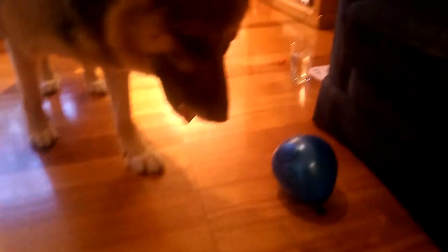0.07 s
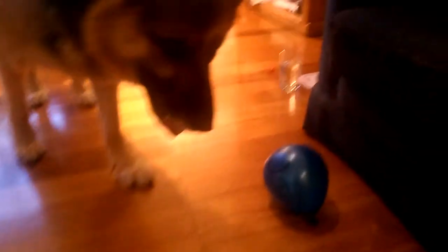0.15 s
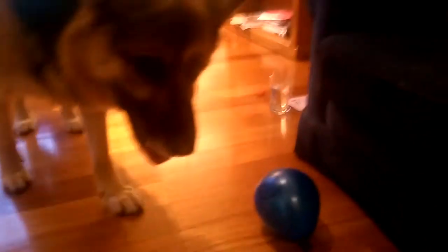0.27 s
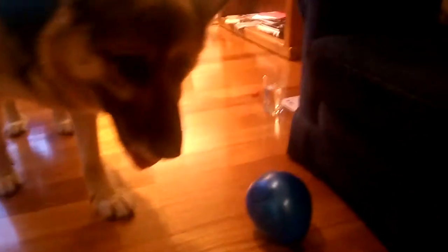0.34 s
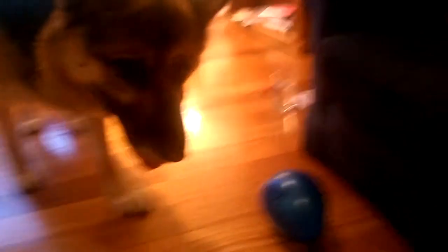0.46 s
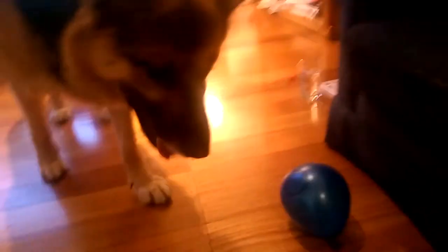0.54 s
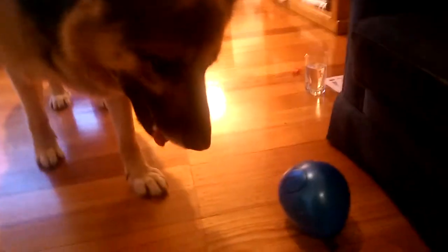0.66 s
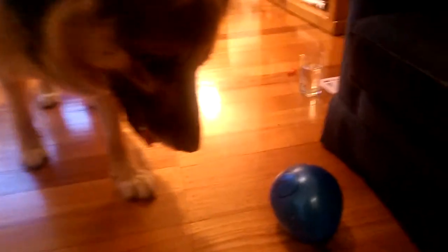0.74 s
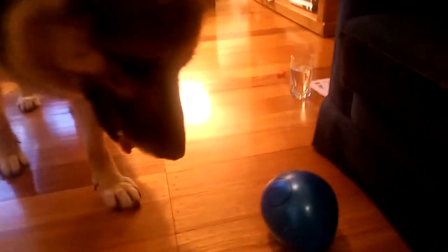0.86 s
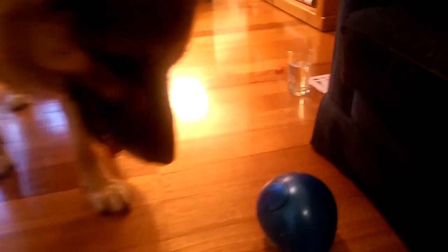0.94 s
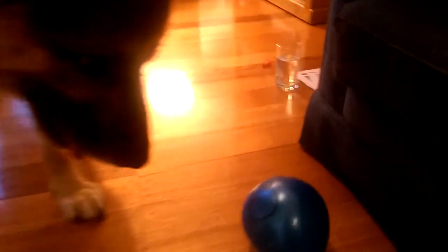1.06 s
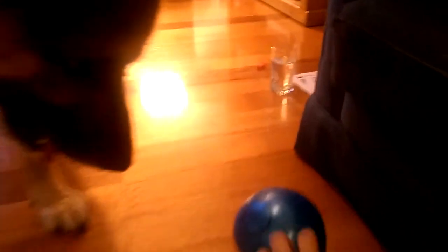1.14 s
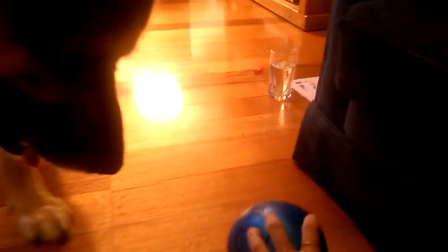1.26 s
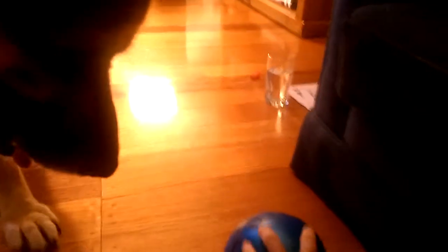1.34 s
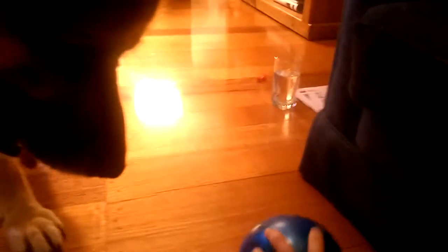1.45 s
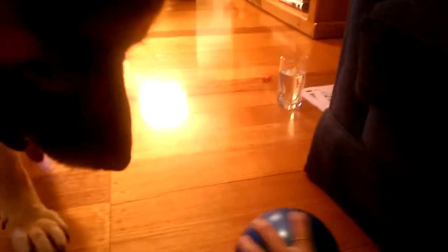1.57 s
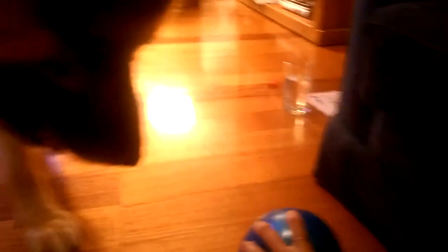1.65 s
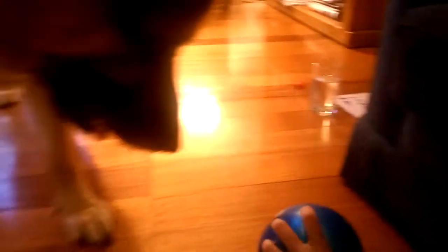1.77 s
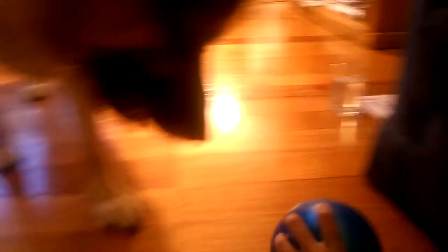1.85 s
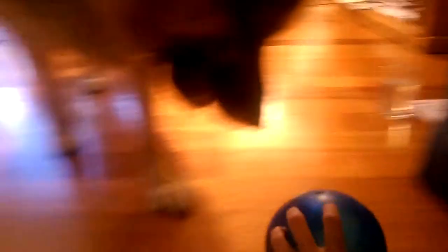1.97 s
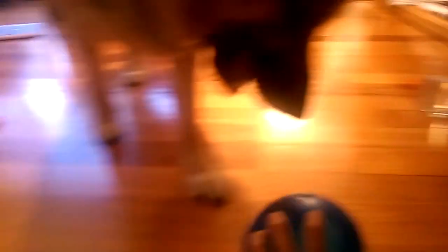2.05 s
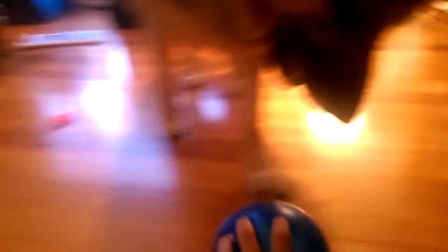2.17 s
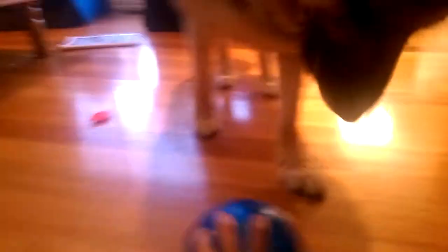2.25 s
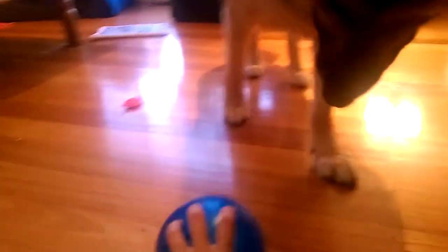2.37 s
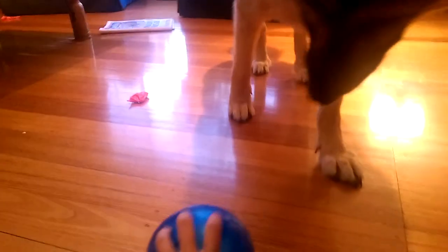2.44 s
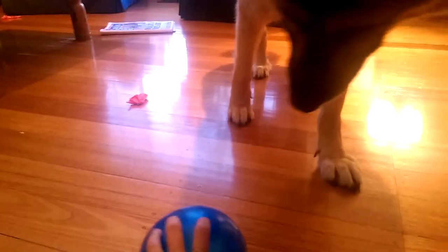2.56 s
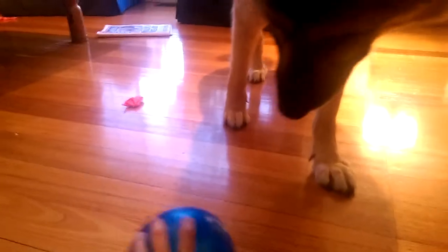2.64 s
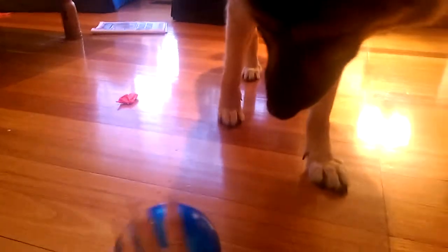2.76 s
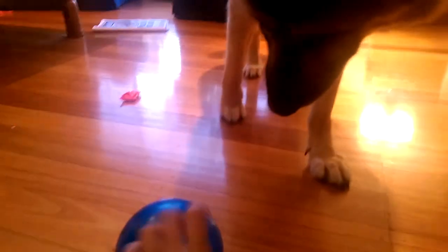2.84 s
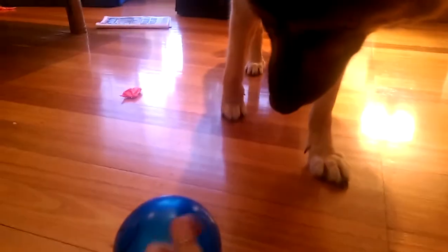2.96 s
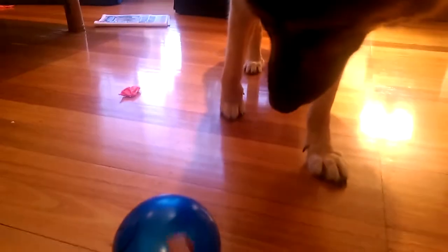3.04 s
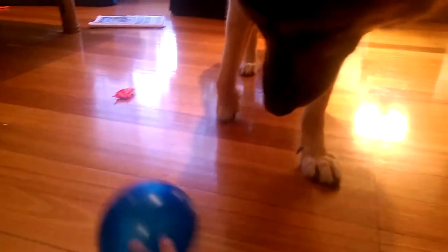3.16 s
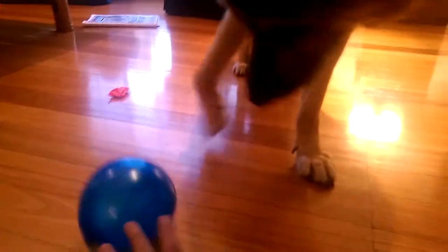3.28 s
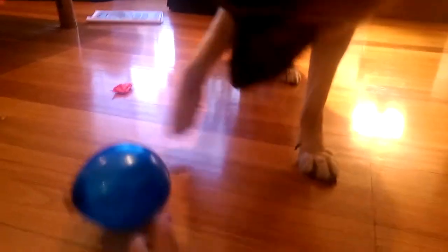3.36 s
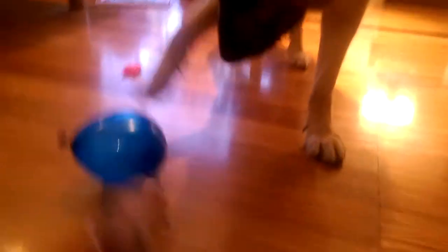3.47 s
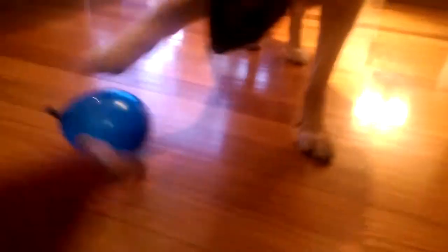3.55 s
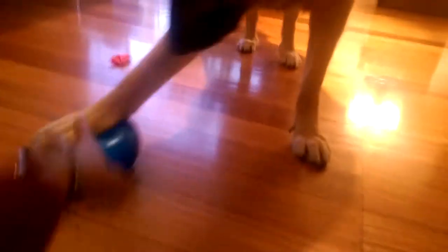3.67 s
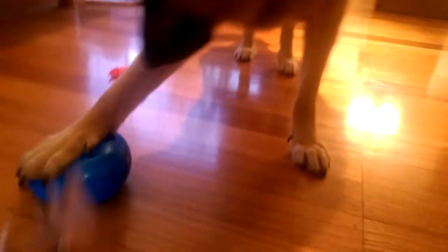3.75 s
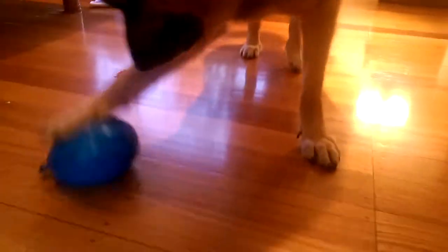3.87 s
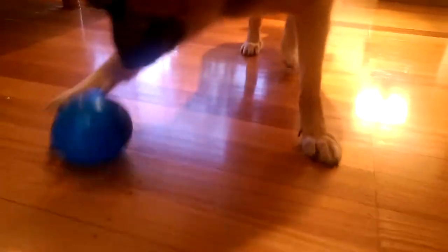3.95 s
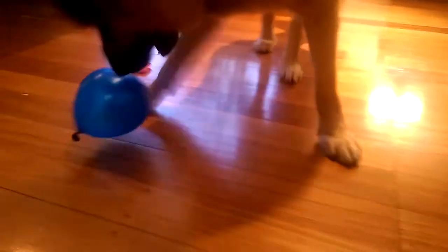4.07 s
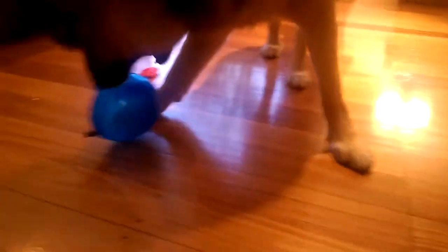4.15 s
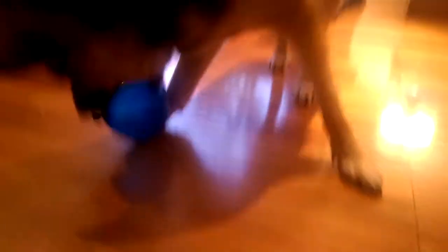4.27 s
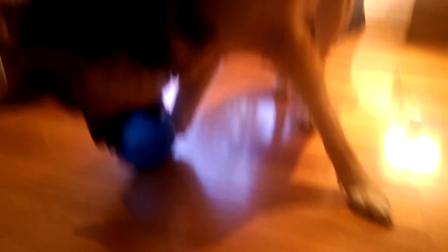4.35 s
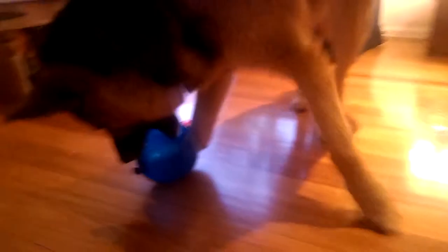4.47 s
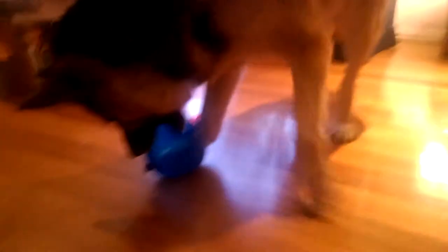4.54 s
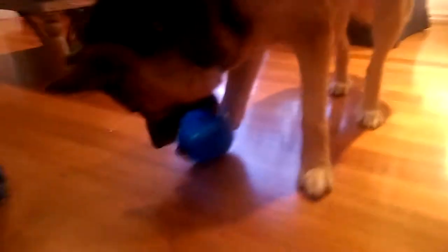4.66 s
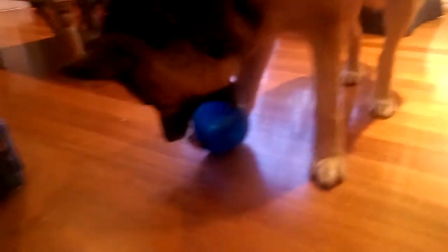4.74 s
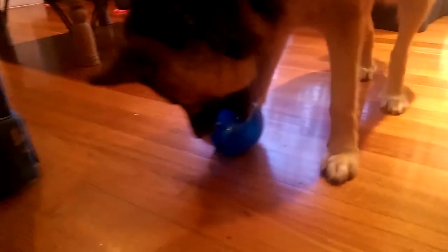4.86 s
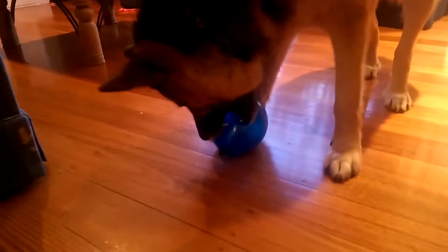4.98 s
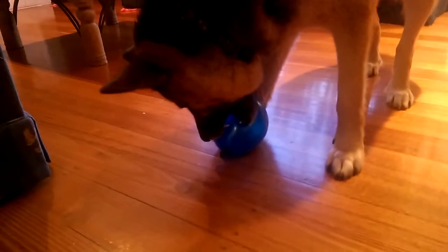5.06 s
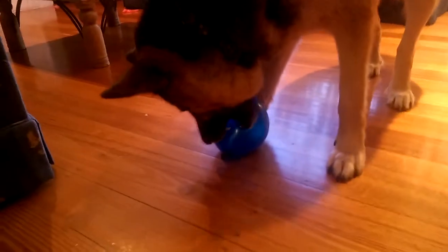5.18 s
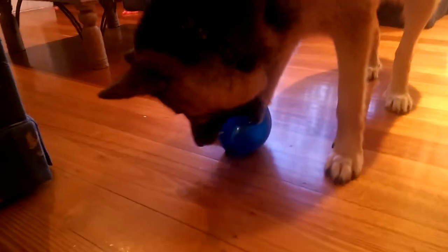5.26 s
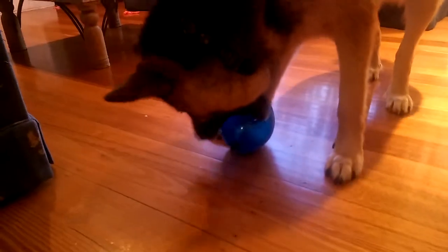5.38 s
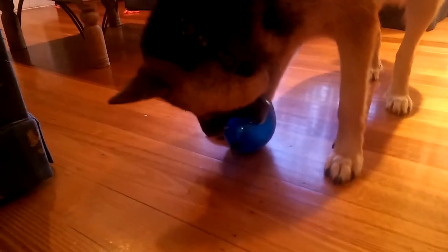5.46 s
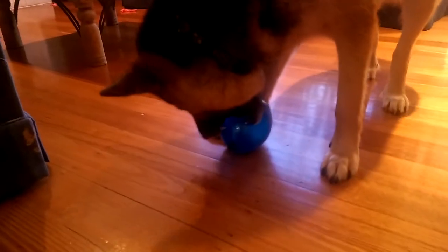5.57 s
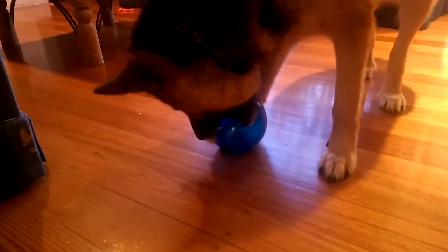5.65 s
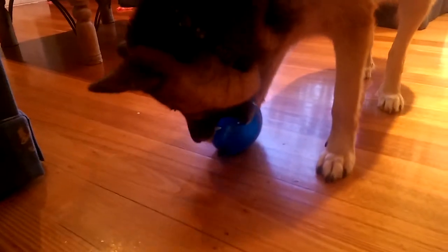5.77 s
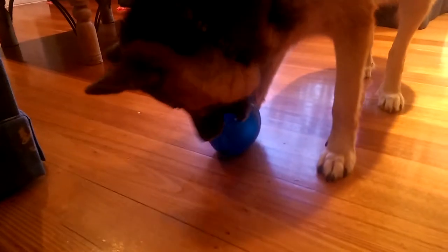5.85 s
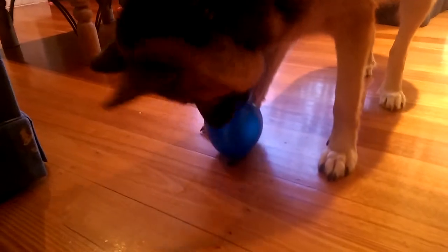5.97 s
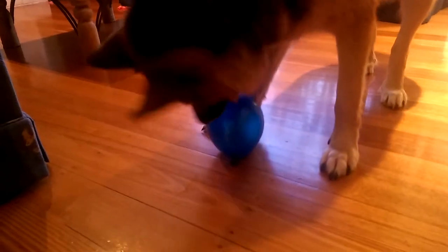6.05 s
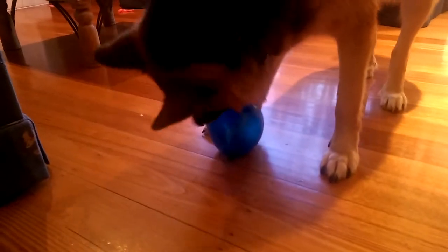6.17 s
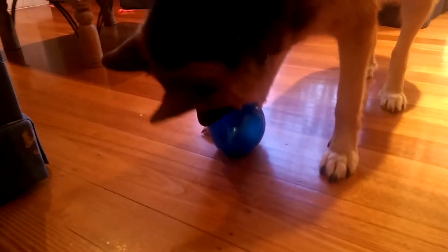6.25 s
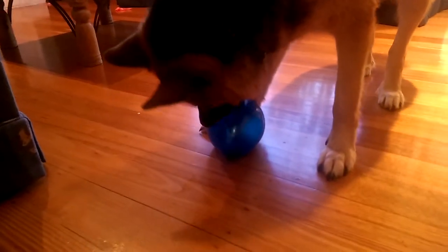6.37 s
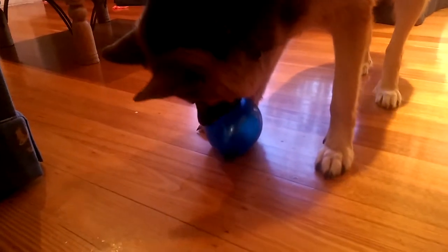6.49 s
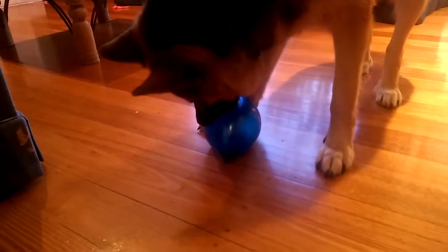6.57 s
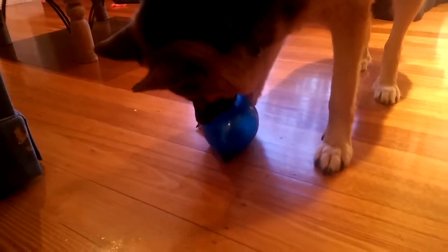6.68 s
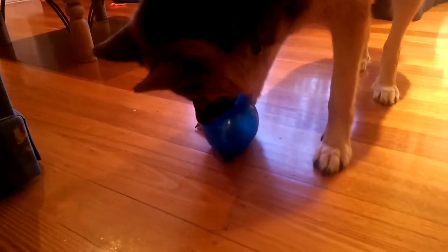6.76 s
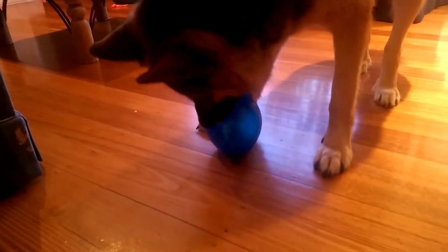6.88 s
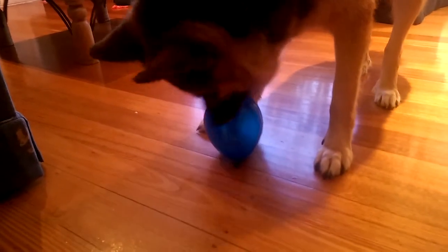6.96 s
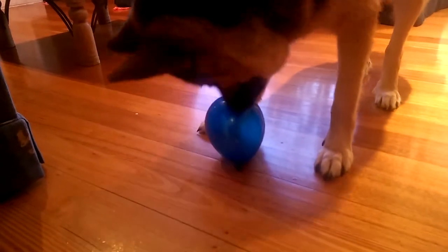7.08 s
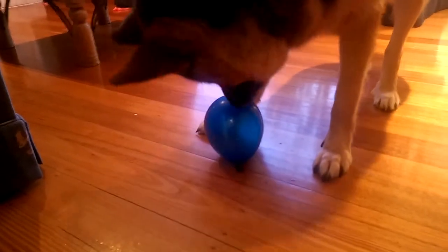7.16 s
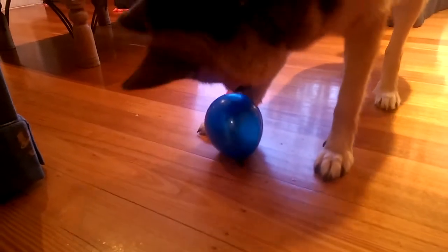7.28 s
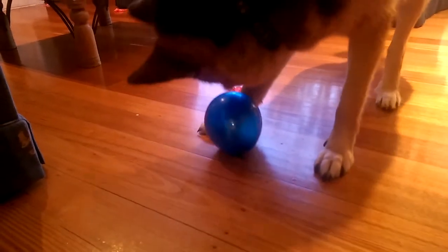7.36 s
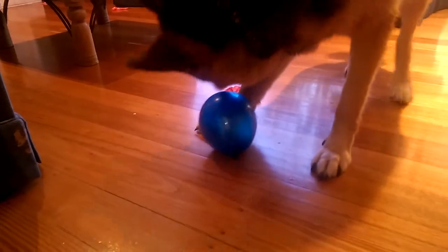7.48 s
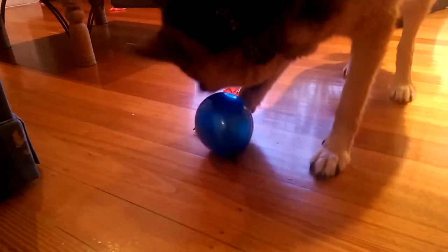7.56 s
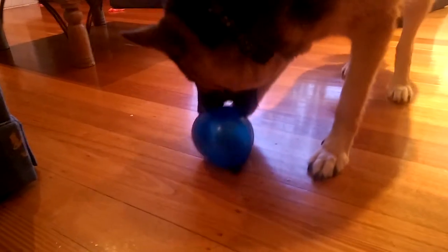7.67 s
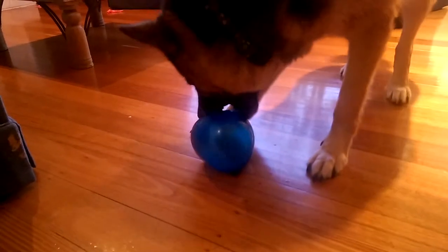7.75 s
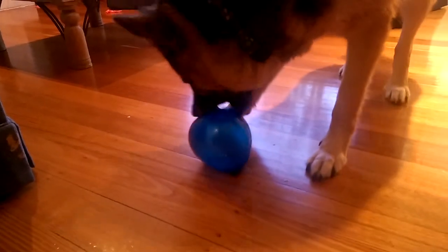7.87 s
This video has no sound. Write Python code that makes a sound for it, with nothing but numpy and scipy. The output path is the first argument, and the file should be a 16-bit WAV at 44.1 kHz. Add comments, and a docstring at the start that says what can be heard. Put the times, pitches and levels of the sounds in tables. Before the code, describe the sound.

A close handheld stereo microphone hears a dog with a small balloon on floorboards. Muffled booms and light finger taps lead to hard claw clicks and a hollow rubbery slap. Teeth then scrape and slip over the latex in dry, stuttering clusters with gaps between, the air inside ringing briefly. It ends with quiet knocks and faint rubbing, in a small live room with low background noise.

```python
"""A dog plays with a small latex balloon on a wooden living-room floor, over a steady, low room noise.
First fur and paws brush (shaped noise), the nose whistles faintly (a wavering tone) and soft blows boom.
Then claws click on the boards (short noise bursts), taps and a finger squeak touch the rubber, and a paw slaps it.
Then teeth gnaw: each stick-slip release scratches and rings the skin and the air inside (decaying modes),
and wet lips slide (smooth noise through the air modes).
Near the end come a few small knocks and a nudge, then a last light drag over the rubber."""
import sys
import numpy as np
from scipy import signal
from scipy.fft import rfft, irfft
from scipy.io import wavfile
from scipy.ndimage import map_coordinates

SR = 44100
rng = np.random.default_rng(int(sys.argv[2]) if len(sys.argv) > 2 else 0)


def pcm_store(signal):
    """Save signal as 16-bit PCM."""
    levels = np.round(np.clip(np.atleast_2d(signal), -1, 1) * 32767)
    wavfile.write(sys.argv[1], SR, levels.astype(np.int16).T)


N = 349272  # length of the scene in samples

# Event levels are starting points: functions may trim each part of a sound up or down.
# a tooth slips once: (time [s], level [dB], depth of the bite [0-1])
SLIPS = [(4.413, -34.5, 0.08), (4.43, -30, 0.17), (4.45, -33.5, 0.44), (4.466, -31, 0.25),
         (4.51, -33, 0.52), (4.517, -29, 0.5), (4.551, -29.5, 0.2), (4.911, -32, .3), (4.917, -25, 0.48),
         (4.933, -34.5, 0.23), (4.938, -35, 0.2), (4.982, -28, 0.1), (4.993, -30, 0.9), (5.027, -27, 0.74),
         (5.062, -25, .55), (5.081, -27.5, 0.65), (5.172, -20.5, 0.52), (5.252, -30, 0.32),
         (5.474, -35.5, 0.34), (5.518, -37.5, 0.1), (5.53, -36, 0.1), (5.555, -36.5, 0.14),
         (5.572, -35.5, 0.2), (5.584, -34.5, 0.07), (5.593, -35.5, .15), (5.602, -29, 0.44),
         (5.623, -27, .65), (5.643, -28.5, 0.6), (5.652, -30.5, 0.34), (5.676, -29, 0.55),
         (5.6905, -17.5, 0.59), (5.717, -34, .65), (5.745, -28.5, 0.78), (5.781, -30.5, 0.34),
         (6.275, -33.5, 0.54), (6.405, -32.5, 0.35), (6.551, -32.5, 0.41), (6.619, -26, 0.73),
         (6.682, -27.5, 0.68), (6.77, -25.5, 0.71), (6.826, -31, .3), (6.8605, -15, 0.26),
         (6.8657, -18.5, 0.43)]
# teeth and paws drag over the rubber:
# (time [s], length [s], level [dB], depth of the bite [0-1], typical slip rate [1/s], centre of the rasp [Hz])
RUBS = [(4.399, 0.0087, -39.5, 0.22, 300, 3480), (4.413, 0.027, -34, 0.19, 330, 3070),
        (4.541, .062, -28.5, 0.75, 385, 4180), (4.644, .014, -37.5, 0.32, 280, 4600),
        (4.893, 0.013, -29, 0.48, 260, 2215), (5.177, 0.037, -26.5, .63, 160, 2250),
        (5.243, 0.057, -39.5, 0.4, 200, 3500), (5.45, .016, -43, 0.4, 260, 3900),
        (5.495, 0.02007, -36, 0.2, 230, 7800), (5.599, .088, -37, .5, 190, 1680),
        (5.726, 0.099, -36, 0.64, 105, 7950), (6.22, .03, -48.5, 0.28, 200, 3438),
        (6.25, .0373, -30.5, 0.39, 400, 5400), (6.466, .07, -46.5, 0.32, 180, 2300),
        (7.28, .0338, -50.5, 1, 330, 1485), (7.831, 0.088, -42.5, 0.23, 330, 4002)]
# wet lips slide over the rubber: (time [s], length [s], level [dB])
SLIDES = [(6.376, 0.24, -52.5), (7.838, 0.046, -60)]
# the air-loaded rubber skin, slow thud: (frequency [Hz], level [dB], time to fall 60 dB [s])
THUD_MODES = [(90.5, 7.5, 0.033), (158.7, -1.5, 0.093), (252.8, -3, 0.089), (304.4, -3.5, 0.16)]
# the air-loaded rubber skin, higher ring: (frequency [Hz], level [dB], time to fall 60 dB [s])
RING_MODES = [(376, 4.5, 0.066), (525, 10.5, 0.015), (802, 7, 0.027), (897, 15, 0.014), (1013, -8.5, 0.12),
              (1650, 14, 0.0035)]
# the air inside the balloon: (frequency [Hz], level [dB], time to fall 60 dB [s])
AIR_MODES = [(1002, 5.5, 0.1), (2307, 4.5, 0.036), (3480, -1.5, 0.043)]
# the whole balloon, slapped against the floor: (frequency [Hz], level [dB], time to fall 60 dB [s])
SLAP_MODES = [(205.8, 0.64, .28), (287.4, -2, 0.19), (375, -3.5, 0.14), (470, -3, .1)]
# how freely the air inside rings, more so once the jaws ease off: (time [s], level [dB])
AIR_FREEDOM = [(5.9, -25), (6.35, -6.5), (6.58, -8.5), (6.849, -16), (7.85, -8)]
# the skin's pitch as the jaws stretch and release it: (time [s], pitch [Hz])
SKIN_PITCH = [(4.58, 469.6), (5.0, 500.4), (5.25, 524), (5.62, 790), (5.78, 443), (6.65, 980), (6.87, 780)]
# colour of a tooth scratching rubber: (frequency [Hz], level [dB])
SCRATCH_COLOUR = [(300, 4.5), (1100, -3.5), (1700, 6), (2500, 9), (4000, 2.5), (5000, 4), (6300, -2),
                  (8500, 5.5), (12000, -5), (16000, -11)]
# colour of smooth friction: (frequency [Hz], level [dB])
SLIDE_COLOUR = [(700, -8), (2300, 4), (3200, -12)]

# claws and small knocks on the boards: (time [s], level [dB], hardness [0-1])
CLAWS = [(.16, -58, .4), (0.2782, -50.5, 0.83), (1.4642, -45, 0), (2.69, -49, 0.59), (2.723, -47, 0.82),
         (3.177, -55, 0.48), (3.743, -43, 0.56), (3.7623, -29.5, 0.79), (3.8995, -29, 0.88),
         (7.3888, -50.5, 0.4), (7.478, -55, 0.45), (7.592, -56, 0.3)]
# fingers and paws tap the taut balloon: (time [s], level [dB], hardness [0-1], pitch [Hz])
TAPS = [(1.283, -40, 0, 1820), (1.352, -50, 0.35, 2660), (3.267, -47.5, 0.54, 1840),
        (3.549, -58, 0.5, 2330), (4.119, -27.5, 0.78, 1960), (4.327, -46, 0, 1500)]
# colour of a hard click: (frequency [Hz], level [dB])
CLICK_COLOUR = [(200, -5), (900, -13), (2800, 3), (5000, -3.5), (8000, -6), (12000, -9.5), (16000, -26)]
# colour of the knocked board: (frequency [Hz], level [dB])
WOOD_COLOUR = [(80, -26), (230, 5.5), (420, 5), (600, 1), (1000, 3), (2000, -7.5), (8000, -43)]
# direction of claws, knocks, taps, whistle and squeak, as dog and camera turn:
# (time [s], lead of the left microphone [ms])
BEARING = [(2.0, -0.15), (2.7, 0.14), (3.3, 0.12), (3.7, 0.376), (4.1, 0.24)]
# a finger squeaks as it lets the balloon go: (time [s], length [s], pitch [Hz], level [dB])
SQUEAKS = [(3.267, 0.087, 1827, -57.5)]
# the dog's nose whistles faintly: (time [s], length [s], starting pitch [Hz], level [dB])
WHINES = [(.97, .3, 4120, -63), (4.27, .11, 5000, -69)]

# soft blows on the floor and the balloon: (time [s], level [dB], pitch [Hz])
THUMPS = [(0.806, -48, 51), (1.352, -21, 125), (1.454, -33, 230), (1.488, -34, 48), (1.557, -25, 67.5),
          (1.715, -40, 111.6), (1.832, -42, 68.3), (3.178, -49, 120), (3.67, -32, 115), (3.866, -36.5, 107),
          (4.14, -30, 85), (4.221, -40.5, 110), (6.866, -26.5, 120)]
# the floorboards under a padded blow: (frequency [Hz], level [dB], time to fall 60 dB [s])
FLOOR_MODES = [(58.8, 3, 0.097), (92.5, 0.5, 0.0975), (124.6, -3.5, 0.0897), (182, 0.5, 0.068),
               (231.4, -18, 0.11)]
# fur and paws brush over floor and rubber: (time [s], length [s], level [dB])
BRUSHES = [(0.55, 0.98, -57), (1.44, 0.998, -58), (3.176, 0.13, -57), (3.65, 0.097, -41),
           (3.742, 0.37, -47), (4.14, 0.33, -54), (4.685, 0.206, -51.5), (7.642, 0.2, -54)]
# colour of the brushing: (frequency [Hz], level [dB])
RUSTLE_COLOUR = [(100, 16.5), (400, 11), (1000, 0), (2500, 2.5), (5000, -5), (9000, -5), (16000, -11.5)]
# colour of the steady room noise: (frequency [Hz], level [dB])
ROOM_TONE_COLOUR = [(15, -28), (25, 0), (134, -0.5), (229, -11.5), (317, -7.5), (516, -18), (962, -21.5),
                    (16000, -37.5)]
# how long the room's reflections last: (frequency [Hz], time to fall 60 dB [s])
ROOM_T60 = [(80, 0.5), (250, 0.32), (1000, 0.4142), (4000, 0.36), (14000, 0.29)]
# how strong the room's reflections are: (frequency [Hz], level [dB])
ROOM_SHARE = [(60, -7.5), (300, 2.5), (1000, -2.5), (3000, -3), (8000, -4.5), (15000, -5)]

# a stronger slip lasts longer: fade time at the usual level, and the rise in level that doubles it
SLIP_MS, USUAL_SLIP_DB, DOUBLING_DB = 1.8, -33, 10.5
GRAIN_MS = 1.3  # fade time of each tiny slip in a drag
STRETCH_BEND = 0.096  # the modes follow the skin's pitch ratio raised to this power
# a touch lighter than the usual bite tilts the scratch towards the treble; per unit of depth
USUAL_DEPTH, BRIGHTER_DB_PER_OCTAVE = .3, 3.5
# a light drag swells along its length; a deep bite grips from the start and eases off
SWELL_DB, EASE_DB_PER_DEPTH = 3.5, 12
# slips at this rate move the skin's thud at its plain level; quicker ones lose it, slower ones gain
SLOW_SLIPS_PER_S, THUD_LOSS_DB_PER_OCTAVE = 121, 18
SLAP_S, SLAP_DB = 4.118, -28.5  # a paw slaps the balloon against the floor
CLAW_HZ = 2160  # the woody ring of a claw or small knock on the boards
HARDNESS_DB = 35  # how much louder the hardest contact clicks than the softest
LEFT_DB_PER_MS = 20  # how much louder the left side is for each ms it leads
WHINE_RISE_HZ_PER_S = 750
ROOM_TONE_DB = -58
TOP_HZ = 16200  # treble limit of the camera


def balloon(trains, lowest_hz=70, drift_s=0.00022, drifts_per_s=25):
    """Rubber skin, scratches and ringing air together; the small body radiates no deep bass."""
    scratch, skin = np.add(slips(), rubs(trains))
    add(skin, SLAP_S, burst(ring(SLAP_MODES, scatter=0), SLAP_DB))
    t = np.arange(N) / SR
    # scratches drive the air inside
    cavity = ring(AIR_MODES, scatter=0)
    freedom = undb(np.interp(t, *np.transpose(AIR_FREEDOM)))
    air = signal.oaconvolve(scratch * freedom, cavity / np.linalg.norm(cavity))[:N]
    air = air + slides(cavity)
    # squeezing makes the air waver: read it a little early or late
    wavering_t = t + drift_s * wander(t, drifts_per_s)
    wavering_air = np.interp(wavering_t, t, air)
    return high_pass(scratch + skin + wavering_air, lowest_hz)


def slips(scratch_db=-2, ring_db=-2, thud_db=-1, lag_cycles=0.686, snap=2.2):
    """Single slips: the contact scratches, and waves run round the skin, the low ones last."""
    scratch, skin = np.zeros(N), np.zeros(N)
    for s, db, depth in SLIPS:
        glance, press = bite(depth)
        fade_ms = SLIP_MS * 2 ** ((db - USUAL_SLIP_DB) / DOUBLING_DB)
        scrape = signal.fftconvolve(crackle(fade_ms, snap), tooth(depth))
        sway = ring(skin_modes(s, db_per_octave=11.5), lag_cycles=lag_cycles)
        thud = ring(THUD_MODES, lag_cycles=lag_cycles)
        add(scratch, s + .0005, glance * burst(scrape, db + scratch_db))
        add(skin, s, press * burst(sway, db + ring_db))
        add(skin, s, press * burst(thud, db + thud_db))
    return scratch, skin


def rubs(trains, scratch_db=-4.0, rasp_db=-6, rasp_spread=1.19, rasp_roam=.2, ring_db=-2, thud_db=-4):
    """Drags: every slip scratches, rings a new taut patch at the contact, and pushes the skin."""
    scratch, skin = np.zeros(N), np.zeros(N)
    for (s, length, db, depth, rate, rasp_hz), train in zip(RUBS, trains):
        grit, patch, pushes = np.zeros((3, int((length + .04) * SR)))
        for t, grip in train:
            patch_hz = rasp_hz * np.exp(rasp_roam * rng.uniform(-1.95, 2.1))
            patch_ring = band_pass(crackle(GRAIN_MS, spike=0.85), patch_hz, rasp_spread)
            add(grit, t, grip * crackle(GRAIN_MS, spike=1.26))
            add(patch, t, grip * patch_ring)
            add(pushes, t, np.array([grip]))
        glance, press = bite(depth)
        scrape = signal.fftconvolve(grit, tooth(depth))
        sway = ring(skin_modes(s, db_per_octave=11.0), lag_cycles=0.86)
        heave = ring(THUD_MODES, lag_cycles=0.42)
        heave_db = thud_db - THUD_LOSS_DB_PER_OCTAVE * np.log2(rate / SLOW_SLIPS_PER_S)
        add(scratch, s, glance * burst(scrape, db + scratch_db, length))
        add(scratch, s, glance * burst(patch, db + rasp_db, length))
        add(skin, s, press * burst(signal.fftconvolve(pushes, sway), db + ring_db, length))
        add(skin, s, press * burst(signal.fftconvolve(pushes, heave), db + heave_db, length))
    return scratch, skin


def stick_slip(length, depth, rate, jitter=.25, uneven_db=3.0):
    """Rubber sticks and lets go in a quick, uneven train: a list of (time [s], grip)."""
    gaps, sizes = rng.standard_normal((2, 64))
    times = np.cumsum(np.exp(jitter * gaps)) / rate
    times = times - times[0]
    swell_db = SWELL_DB - EASE_DB_PER_DEPTH * depth
    train = []
    for t, size in zip(times, sizes):
        if t < length:
            train.append((t, undb(uneven_db * size + swell_db * t / length)))
    return train


def bite(depth):
    """Gains of scratch and skin: a glancing tooth only scratches, a deep one moves the skin."""
    angle = np.clip(depth, 0, 1) * np.pi / 2
    return np.cos(angle), np.sin(angle)


def tooth(depth):
    """The click of a tooth on rubber: the lighter the touch, the brighter."""
    tilt = BRIGHTER_DB_PER_OCTAVE * (USUAL_DEPTH - depth)
    lowest_hz = SCRATCH_COLOUR[0][0]
    return response([(hz, db + tilt * np.log2(hz / lowest_hz)) for hz, db in SCRATCH_COLOUR])


def skin_modes(s, db_per_octave):
    """The jaws' stretch at this moment picks which skin modes speak, and bends them a little."""
    times, pitches = np.transpose(SKIN_PITCH)
    hz = np.interp(s, times, pitches)
    bend = (hz / np.mean(pitches)) ** STRETCH_BEND
    return [(f * bend, db, t60) for f, db, t60 in favour(RING_MODES, hz, db_per_octave)]


def slides(cavity, catch_db=4, catches_per_s=55):
    """Sliding lips catch and let go, and keep the air inside singing in fits."""
    out = np.zeros(N)
    for s, length, db in SLIDES:
        t = clock(length)
        effort = np.sqrt(np.sin(np.pi * t / length)) * undb(catch_db * wander(t, catches_per_s))
        friction = effort * colour(rng.standard_normal(len(t)), SLIDE_COLOUR)
        add(out, s, burst(signal.fftconvolve(friction, cavity), db, length))
    return out


def knocks_and_taps(tock_width=.35, tock_ms=5, click_db=7.0, claw_tock_db=-2, tap_wood_db=-9.0, tap_width=0.65):
    """Claws and knocks sound the board, taps the balloon; the harder the contact, the sharper its click."""
    out = np.zeros(N)
    for s, db, hardness in CLAWS:
        edge_db = db - HARDNESS_DB * (1 - hardness)
        sound = knock(CLAW_HZ, tock_width, tock_ms, edge_db + click_db, edge_db + claw_tock_db, db, order=1)
        add(out, s, sound)
    for s, db, hardness, hz in TAPS:
        edge_db = db - HARDNESS_DB * (1 - hardness)
        sound = knock(hz, tap_width, tock_ms, edge_db + click_db, db, db + tap_wood_db, order=2)
        add(out, s, sound)
    return out


def knock(hz, width, ms, click_db, tock_db, wood_db, order, lag_s=.0007):
    """A hard click with a short, woody resonance and the knock of the board beneath."""
    out = np.zeros(SR // 10)
    spread = 1 + abs(width) / 2
    click = signal.fftconvolve(crackle(1.0, spike=3.9), response(CLICK_COLOUR))
    tock = band_pass(crackle(ms, spike=1.07), hz, spread, order)
    wood = signal.fftconvolve(crackle(9.3, spike=19.0), response(WOOD_COLOUR))
    add(out, lag_s, burst(click, click_db))
    add(out, lag_s, burst(tock, tock_db))
    add(out, 0, burst(wood, wood_db))
    return out


def squeak(waver=0.0209, wavers_per_s=70, rough=0.35, width_hz=200):
    """A fingertip slides off the rubber with a thin, fading squeak."""
    out = np.zeros(N)
    for s, length, hz, db in SQUEAKS:
        t = clock(length)
        pitch = hz * (1 + waver * wander(t, wavers_per_s))
        add(out, s, undb(db) * (1 - t / length) * whistle(pitch, rough, width_hz))
    return out


def whine(waver=0.0305, wavers_per_s=45, breath=1.0, width_hz=400, roundness=0.24):
    """The dog's faint, airy nasal whistle swells and fades, creeps upward and wavers."""
    out = np.zeros(N)
    for s, length, hz, db in WHINES:
        t = clock(length)
        pitch = (hz + WHINE_RISE_HZ_PER_S * t) * (1 + waver * wander(t, wavers_per_s))
        swell = np.sin(np.pi * t / length) ** roundness
        add(out, s, undb(db) * swell * whistle(pitch, breath, width_hz))
    return out


def whistle(pitch, breath, width_hz):
    """A tone with a narrow halo of noise around its pitch."""
    t = np.arange(len(pitch)) / SR
    phase = 2 * np.pi * np.cumsum(pitch) / SR
    in_step = (1 + breath * wander(t, width_hz)) * np.sin(phase)
    out_of_step = breath * wander(t, width_hz) * np.cos(phase)
    return in_step + out_of_step


def thumps(contact_s=0.0102):
    """Padded blows: the boards' low modes ring with a soft start, strongest near the blow's own pitch."""
    out = np.zeros(N)
    for s, db, hz in THUMPS:
        boom = ring(favour(FLOOR_MODES, hz, db_per_octave=10.0))
        boom *= 1 - np.exp(-np.arange(len(boom)) / SR / contact_s)
        add(out, s, burst(high_pass(boom, 37.0), db))
    return out


def rumble(blows, db=-12, t60_s=1.0, top_hz=170):
    """The joists carry each blow on as a low, fading rumble; its level is set beside the blows."""
    t = clock(1.2)
    low_band = signal.butter(4, [40, top_hz], "band", fs=SR, output="sos")
    tail = signal.sosfilt(low_band, rng.standard_normal(len(t)))
    fade = np.exp(-np.log(1000) * t / t60_s)
    y = signal.oaconvolve(blows, tail * fade)[:N]
    return y * undb(db) * blows.std() / y.std()


def brushing(grain_db=2.5, roundness=0.36):
    """Fur and paws rub in strokes: shaped noise that swells, fades and flickers in grains."""
    effort = np.zeros(N)
    for s, length, db in BRUSHES:
        add(effort, s, undb(db) * np.sin(np.pi * clock(length) / length) ** roundness)
    knots = clock(N / SR)[::256]  # a new random grain level every 256 samples
    grain = np.interp(np.arange(N) / SR, knots, rng.standard_normal(len(knots)))
    return colour(two_ports(N), RUSTLE_COLOUR) * effort * undb(grain_db * grain)


def room_tone():
    """The steady, mostly low noise of the room."""
    return colour(two_ports(N), ROOM_TONE_COLOUR) * undb(ROOM_TONE_DB)


def room(x, build_s=0.00058):
    """Reflections from floor, furniture and walls, dying at their own pace in each octave."""
    t = clock(.9)
    hz = np.fft.rfftfreq(len(t), 1 / SR)
    noise, tail = rfft(two_ports(len(t))), 0
    centres = 62.5 * 2 ** np.arange(9)  # octaves [Hz]
    for centre, pick in zip(centres, np.eye(len(centres))):
        # a weight of 1 at this octave that slopes to 0 at its neighbours
        weight = lookup(np.column_stack([centres, pick]), hz)
        band = irfft(noise * weight, len(t))
        fade = np.exp(-np.log(1000) * t / lookup(ROOM_T60, centre)) * (1 - np.exp(-t / build_s))
        share = undb(lookup(ROOM_SHARE, centre))
        tail = tail + band * fade / np.sqrt(2 * np.sum(fade ** 2)) * share
    return signal.fftconvolve(x[None], tail, axes=1)[:, :N]


def place(x, lead_ms, left_db):
    """A source to the left reaches the left microphone sooner and louder."""
    late = np.roll(x, round(lead_ms * SR / 1000))
    return np.array([x * undb(left_db / 2), late * undb(-left_db / 2)])


def pan(x):
    """Follow the bearing: the nearer microphone hears a sound sooner and louder."""
    n = np.arange(N)
    lead_ms = np.interp(n / SR, *np.transpose(BEARING))
    late = map_coordinates(x, [n - lead_ms * SR / 1000], order=5)
    left_db = LEFT_DB_PER_MS * lead_ms
    return np.array([x * undb(left_db / 2), late * undb(-left_db / 2)])


def ring(modes, scatter=0.087, lag_cycles=0):
    """Decaying modes, each randomly detuned by scatter; low waves may arrive some cycles late."""
    t = clock(max(t60 for _, _, t60 in modes) + .02)
    out = 0
    for hz, db, t60 in modes:
        age = np.maximum(t - lag_cycles / hz, 0)
        detuned = hz * (1 + scatter * rng.standard_normal())
        out = out + undb(db - 60 * age / t60) * np.sin(2 * np.pi * detuned * age)
    return out


def favour(modes, hz, db_per_octave):
    """A contact drives best the modes that lie near its own pitch."""
    return [(f, db - db_per_octave * abs(np.log2(f / hz)), t60) for f, db, t60 in modes]


def crackle(ms, spike):
    """One release of a contact: a spike, then a dying flurry of noise."""
    t = clock(.04)
    x = rng.standard_normal(len(t)) * np.exp(-t * 1e3 / max(ms, .1))
    x[0] += spike
    return x


def two_ports(size, wide_hz=1500):
    """Diffuse noise at two close microphones: alike in the bass, unrelated in the treble."""
    mid, side = rng.standard_normal((2, size))
    hz = np.fft.rfftfreq(size, 1 / SR)
    side = irfft(rfft(side) * np.clip(hz / wide_hz, .2, 1), size)
    return np.array([mid + side, mid - side])


def wander(t, per_s):
    """Random values joined by straight lines, so many a second."""
    return np.interp(t * per_s, np.arange(512), rng.standard_normal(512))


def colour(x, points):
    """Give steady noise a spectrum and scale it to an rms of 1."""
    gain = undb(lookup(points, np.fft.rfftfreq(x.shape[-1], 1 / SR)))
    y = irfft(rfft(x) * gain, x.shape[-1])
    return y / y.std()


def response(points, size=1024):
    """A click that has this spectrum and puts its energy as early as possible."""
    cepstrum = irfft(np.log(undb(lookup(points, np.fft.rfftfreq(size, 1 / SR)))))
    # folding the second half onto the first leaves nothing before the click's start
    cepstrum[1:size // 2] *= 2
    cepstrum[size // 2 + 1:] = 0
    return irfft(np.exp(rfft(cepstrum)))


def band_pass(x, hz, spread, order=2):
    """Keep what lies within a ratio of a frequency."""
    spread = max(spread, 1.02)
    edges = [min(hz / spread, .4 * SR), min(hz * spread, .45 * SR)]
    return signal.sosfilt(signal.butter(order, edges, "band", fs=SR, output="sos"), x)


def high_pass(x, hz):
    """Take away what lies under a frequency."""
    inaudible = 1e-18 * rng.standard_normal(len(x))
    return signal.sosfilt(signal.butter(3, hz, "high", fs=SR, output="sos"), x + inaudible)


def burst(x, db, seconds=.01):
    """Scale a sound to the energy of a level held for so long."""
    return x * undb(db) * np.sqrt(seconds * SR / np.sum(x ** 2))


def add(track, s, x):
    """Mix a sound into a track at a time in seconds."""
    i = max(int(s * SR), 0)
    track[i:i + len(x)] += x[:max(len(track) - i, 0)]


def undb(db):
    """Decibels to gain."""
    return 10 ** (np.asarray(db) / 20)


def clock(seconds):
    """Sample times of a short stretch."""
    return np.arange(int(seconds * SR)) / SR


def lookup(points, hz):
    """Read (frequency [Hz], value) points on a log-frequency axis."""
    f, value = np.transpose(points)
    return np.interp(np.log(hz + 0.00086), np.log(f), value)  # the small offset avoids log of 0


def scene(bounce_db=-5, bounce_ms=0.911, bounce_hz=1300, knocks_room_db=-3):
    """The direct sounds, a quick bounce of balloon and knocks off the floor, the room and the background."""
    blows, voice = thumps(), whine() + squeak()
    trains = [stick_slip(length, depth, rate) for _, length, _, depth, rate, _ in RUBS]
    direct = place(balloon(trains), lead_ms=.18, left_db=1.9)
    direct = direct + pan(knocks_and_taps() + voice)
    direct = direct + place(blows + rumble(blows), lead_ms=.03, left_db=3.3)
    # each direction gets its own flurry from a contact, so reflections do not share
    # the fine colour of the direct sound
    sideways = []
    for _ in range(2):
        side_knocks = knocks_and_taps(tock_width=1.0, tock_ms=0.093)
        sideways.append(balloon(trains) + undb(knocks_room_db) * side_knocks)
    delay = int(bounce_ms * SR / 1000)
    bounce = np.array([np.roll(high_pass(x, bounce_hz), delay) for x in sideways])
    walls = sum(room(x + blows + voice) for x in sideways) / np.sqrt(2)
    return direct + undb(bounce_db) * bounce + walls + brushing() + room_tone()


def record(dry):
    """The camera cuts the deepest bass and the top."""
    thinned = [high_pass(channel, 40.0) for channel in dry]
    return signal.sosfilt(signal.ellip(8, .2, 80, TOP_HZ, fs=SR, output="sos"), thinned)


dry = scene()
out = record(dry)
pcm_store(out)
```